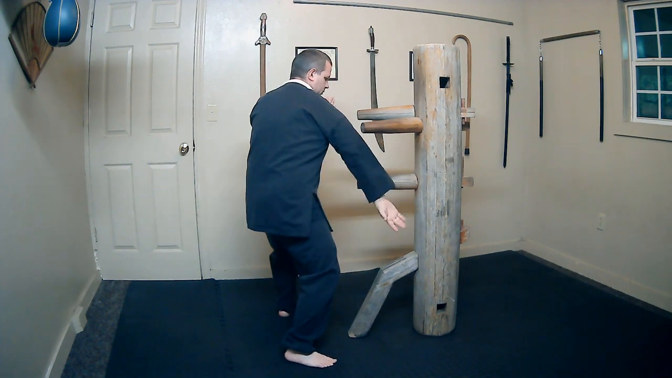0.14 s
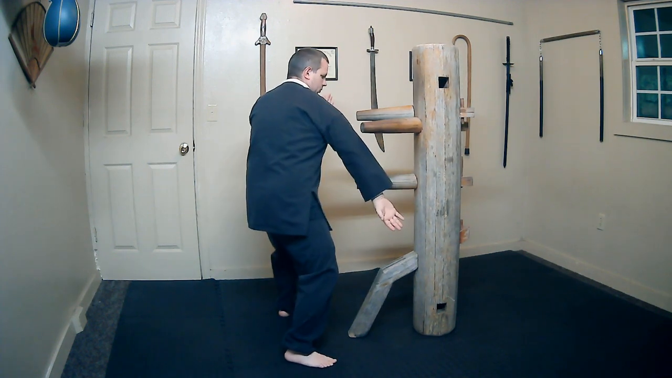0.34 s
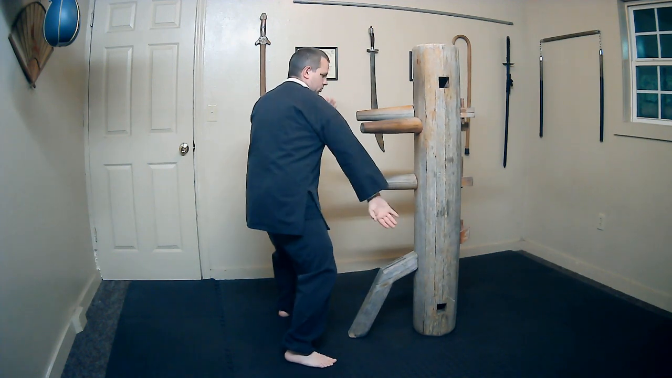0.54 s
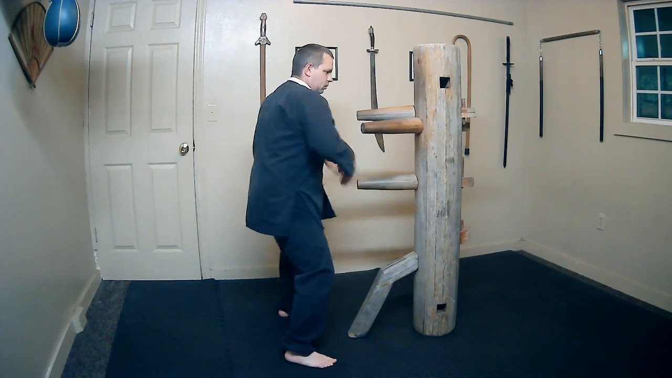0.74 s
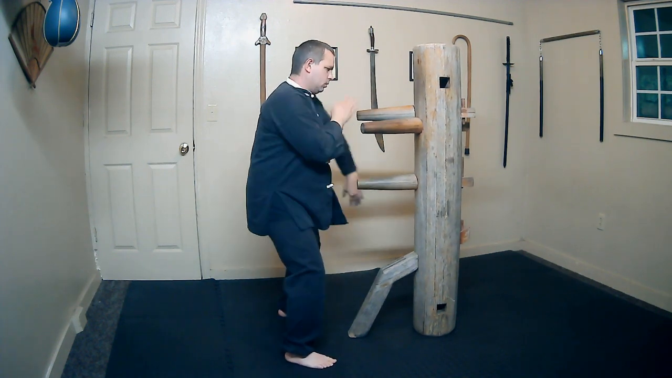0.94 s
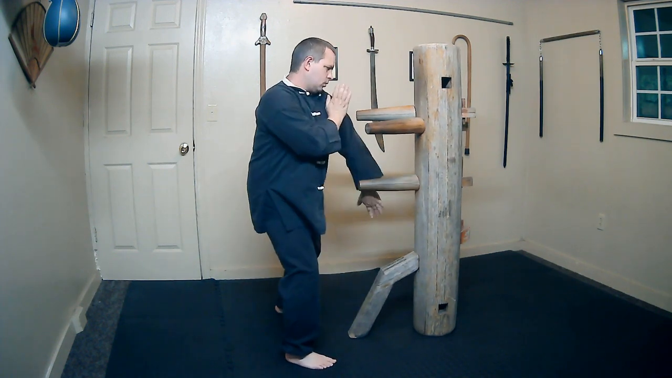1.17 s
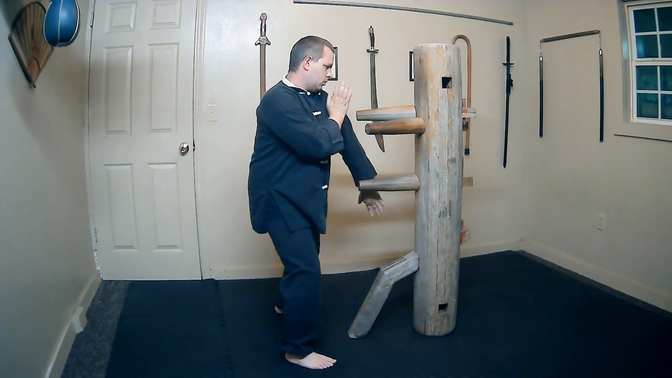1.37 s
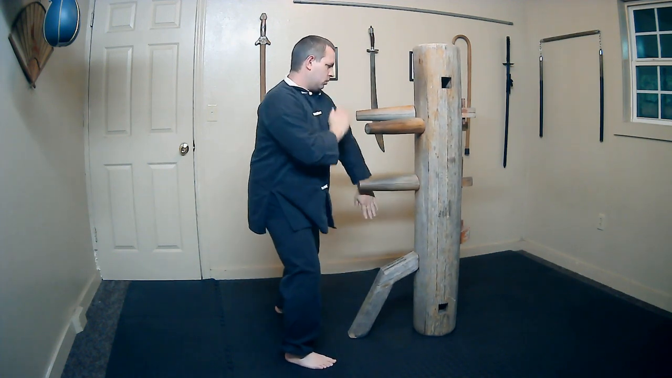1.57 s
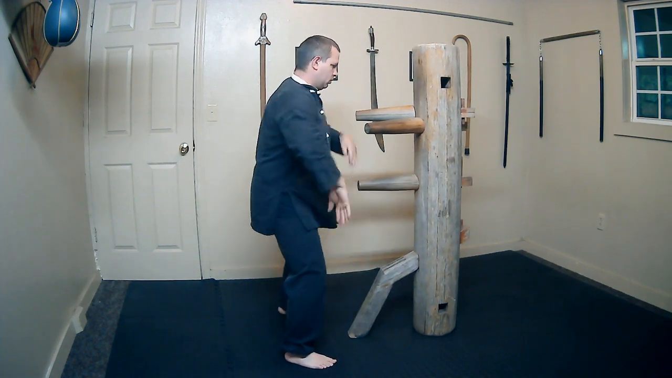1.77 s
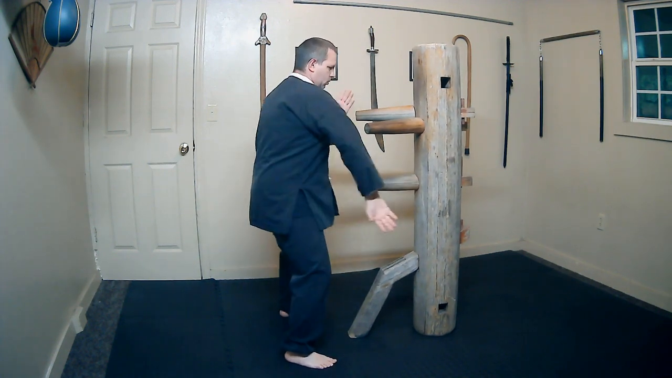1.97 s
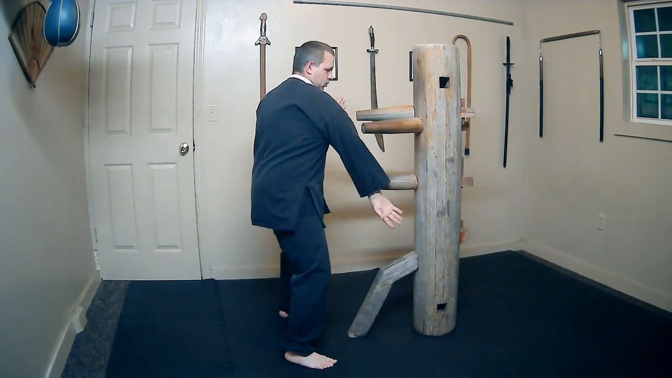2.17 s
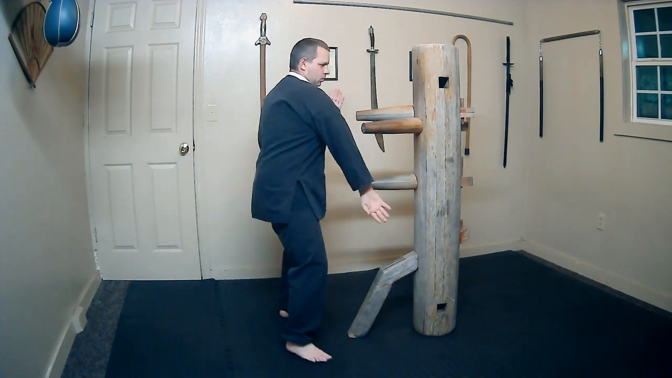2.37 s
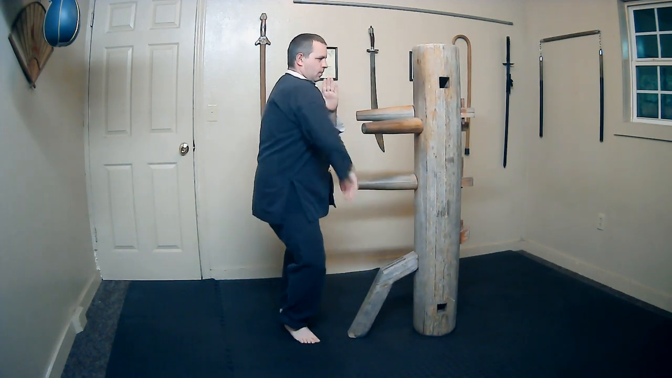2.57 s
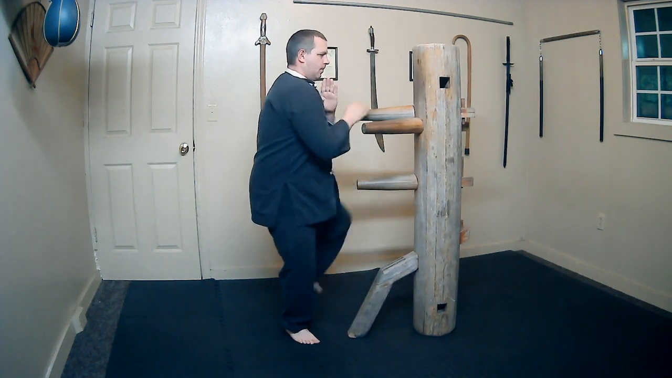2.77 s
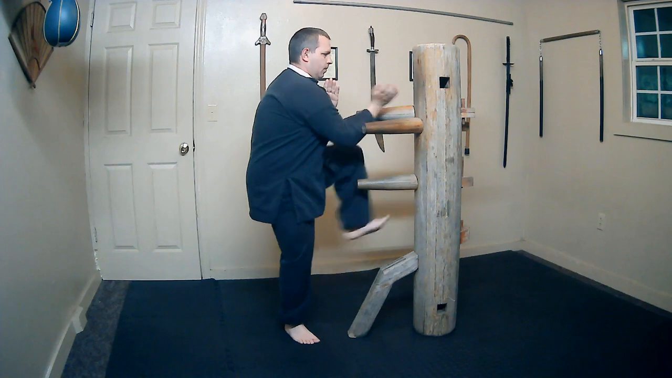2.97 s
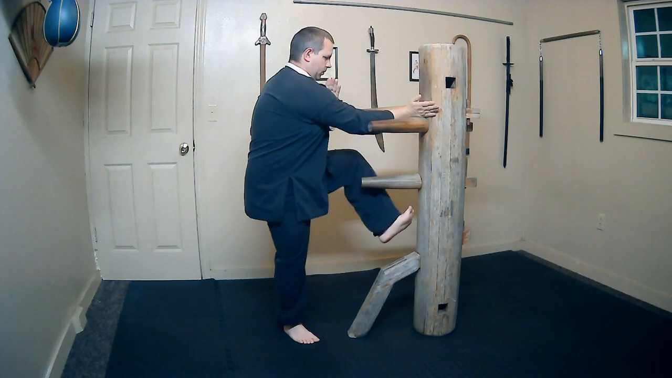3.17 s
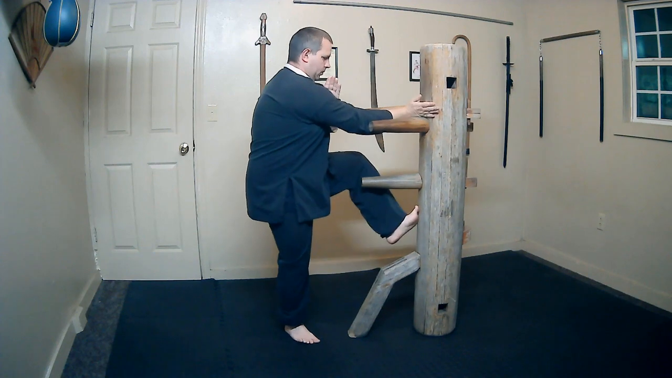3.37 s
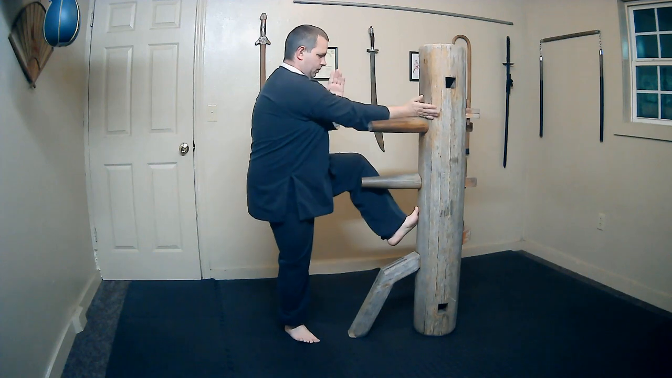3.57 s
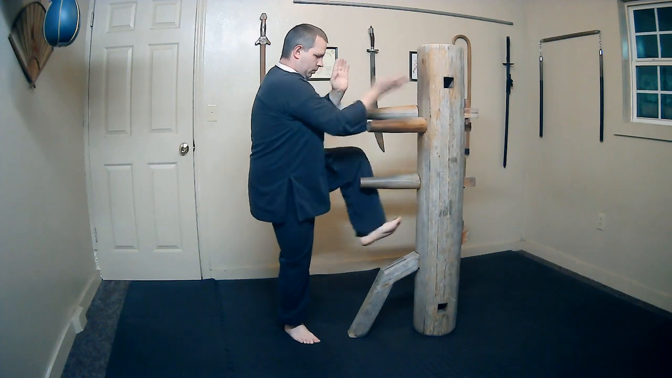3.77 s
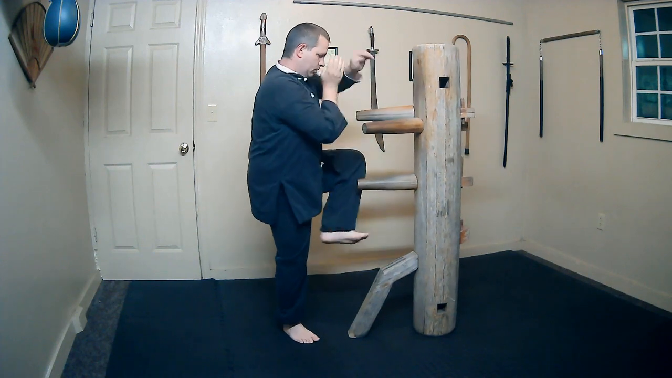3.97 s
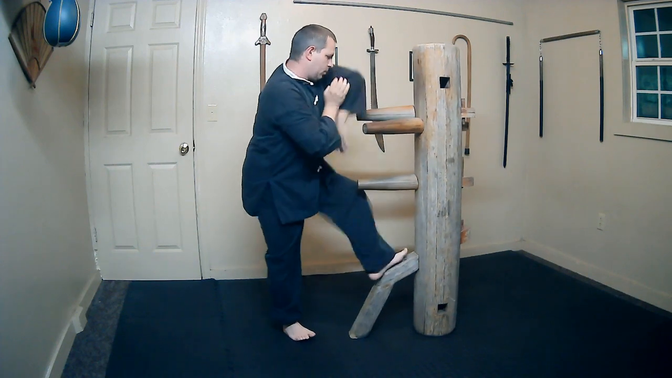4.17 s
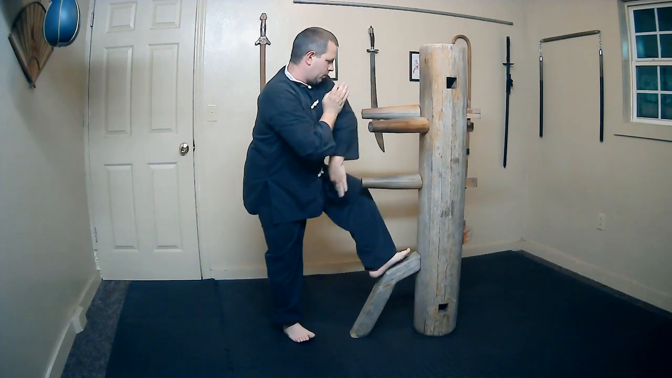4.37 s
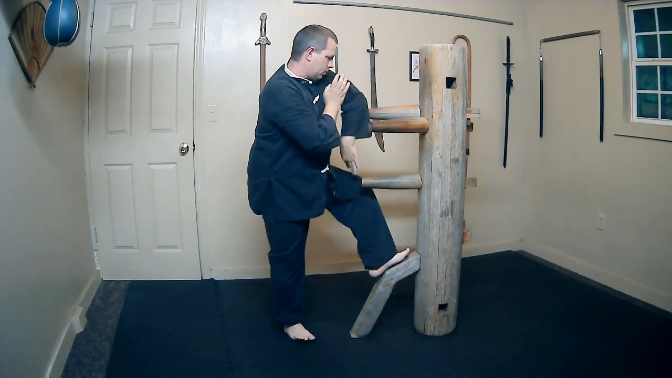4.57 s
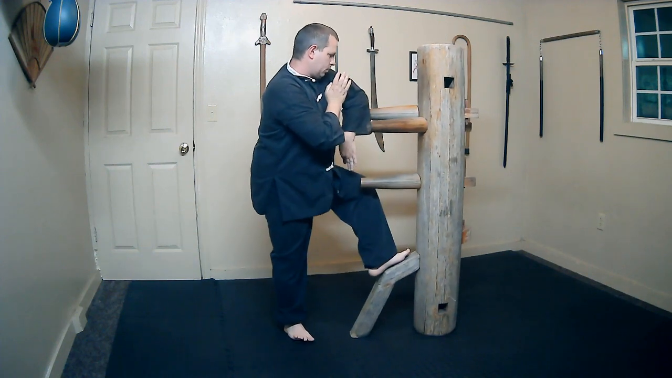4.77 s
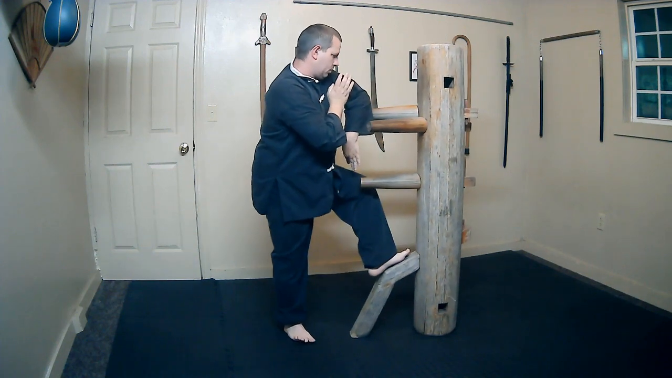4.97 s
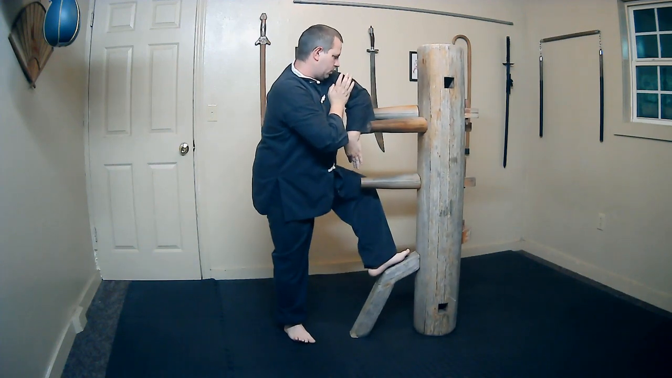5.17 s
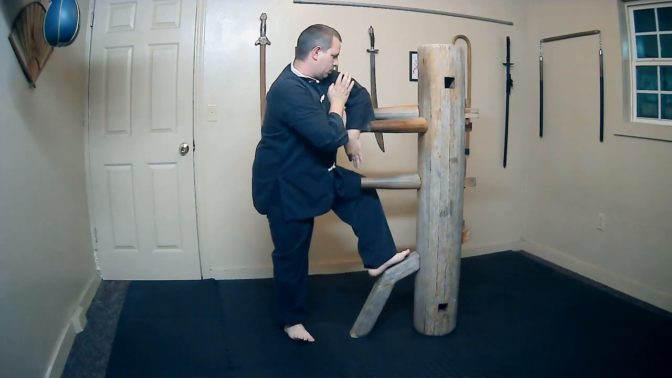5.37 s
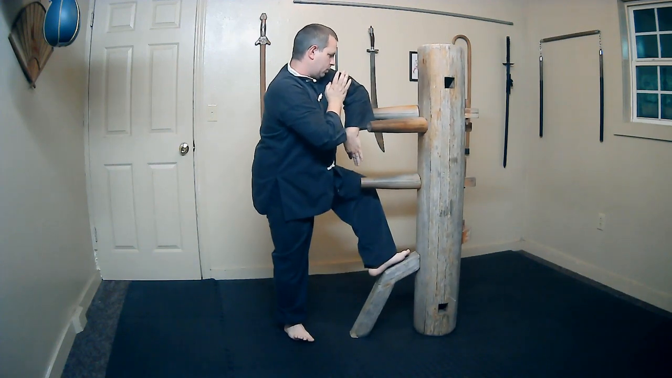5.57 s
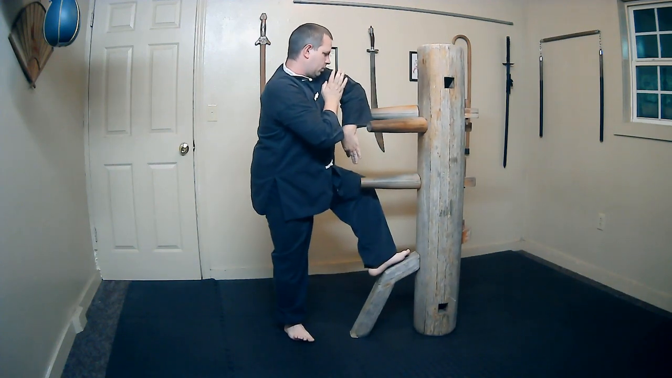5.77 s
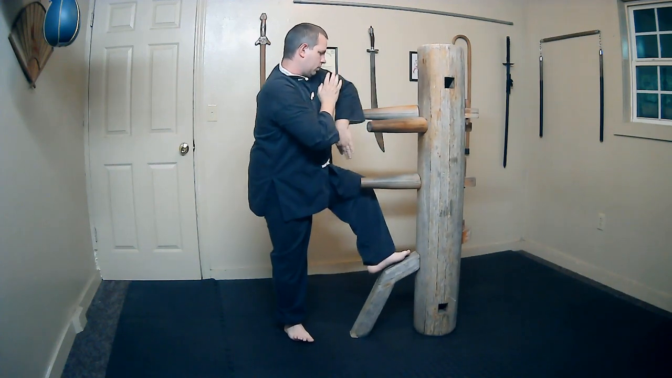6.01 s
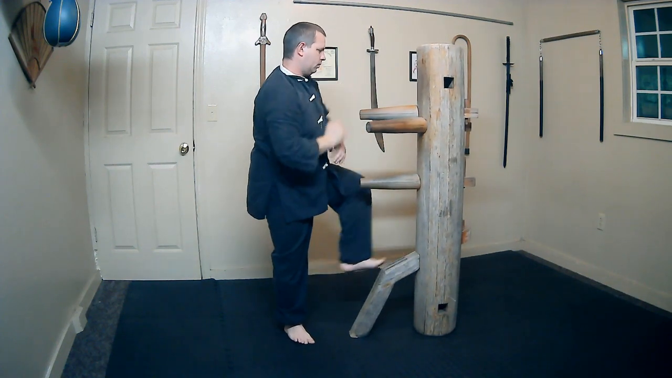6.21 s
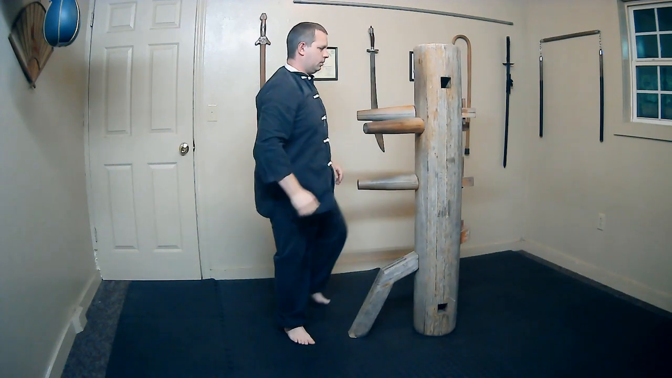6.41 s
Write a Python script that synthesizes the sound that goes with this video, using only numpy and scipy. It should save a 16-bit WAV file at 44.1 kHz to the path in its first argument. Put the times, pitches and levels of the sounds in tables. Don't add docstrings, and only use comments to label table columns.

```python
import sys
import numpy as np
from scipy import signal
from scipy.fft import rfft, irfft
from scipy.io import wavfile
from scipy.ndimage import uniform_filter1d

SR = 44100
rng = np.random.default_rng(int(sys.argv[2]) if len(sys.argv) > 2 else 0)


def int16_out(signal):
    q = np.round(np.clip(np.atleast_2d(signal).T, -1, 1) * 32767)
    wavfile.write(sys.argv[1], SR, q.astype(np.int16))


def ratio_of_db(decibels):
    return 10 ** (np.asarray(decibels, float) / 20)


N = 284180

# start in seconds, strength in dB, post share in dB, hard edge share in dB.
CONTACTS = [(0.135, -19.5, -13, -7.5), (0.141, -23.5, 2, 1), (0.149, -44, 11, -13), (0.175, -29, 2.5, -18),
            (0.211, -39, 1.5, 1), (0.263, -30, -6, -23), (0.734, -30, -7.5, 3), (0.741, -28.5, -0.5, -11),
            (0.754, -35.5, 4.5, -0.5), (0.791, -29, -9, -10.5), (1.131, -10.5, -14, 3.5),
            (1.139, -14, -4, 1), (1.15, -18.5, -4, -5), (2.161, -18.5, 3, 4), (2.168, -11, -17, -0.5),
            (2.174, -18, -10.5, -3.5), (2.193, -15, 0.5, -28), (2.216, -33, -10, -10),
            (2.233, -39, -13.5, -17.5), (2.576, -51, 16.5, -12), (2.608, -41, 6.5, -22),
            (2.932, -67.5, 17, -26.5)]
# start in seconds, strength in dB, post share in dB, hard edge share in dB.
KICKS = [(1.745, -28, -28, -4), (1.7595, -30.5, -18, -13), (1.777, -35, -16, -18), (2.779, -44.5, -1, -9.5),
         (3.096, -32.5, -0.5, -30), (3.108, -26.5, -10, -24), (3.117, -26, -8.5, -17),
         (3.132, -37.5, 10, -24), (3.164, -51, -19, -30), (3.193, -44, -16, -30), (4.019, -57.5, 2, 11),
         (4.2255, -33, -8.5, -6), (4.244, -28, -5, 1.5), (4.234, -34, -10, -27), (4.253, -30, -10, -14),
         (4.261, -23, -16, -14.5), (4.2682, -24, -20, -20), (4.282, -34, -16, -25), (4.313, -47, 11, -30),
         (4.642, -60.5, 1.5, -27)]
# start in seconds, strength in dB.
PUSHES = [
    (0.1281, -34),
    (0.73, -30.5),
    (1.1289, -23),
    (2.1571, -25.5),
    (2.1587, -11.5),
]
PUSH_POST_DB = -13
# start of the blow in seconds, lower knock share in dB,
# upper knock share in dB, clack ring in dB, higher hard rings in dB.
BLOWS = [(0, -3, 0.5, -5, -8.5), (.6, -10, -4, -7, -5.5), (1.0, -1.5, 4.5, -3.5, -10.5),
         (1.6, -36, -13.5, -15, -14.5), (2.0, -22, -1.5, -7, -5), (2.5, -9, -3, -28, -24),
         (2.7, 2.5, 12.5, -25, -25), (3.0, -11, 0.5, -39, -40), (4.0, 1, 0, -37.5, -40),
         (4.2, -3, 9.5, -42, -40), (4.235, 12, 3, -40, -38.5), (4.258, 4, 9.5, -40, -40)]
# upper clack in dB, crack in dB, upper crack in dB, air in dB.
EDGE_COLOURS = [(2.5, -13.5, -14.5, -22.5), (-7, -20.5, -22.5, -30), (-1, -5, -0.5, -25),
                (-10.5, -22.5, -22, -35.5), (-5.5, -9, -9.5, -26.5), (0, 0, 0, -10), (0, 16.5, 2, -12),
                (10, 3.5, 0, -13), (0.5, 0, -1, -14), (7.5, 13.5, 3.5, -5), (-4, -15, -9, -16),
                (0, -9, -3, -8)]

# frequency in Hz, level in dB, T60 in seconds.
KNOCK_MODES = [(608.7, -0.24, 0.062), (688.3, -0.53, 0.056), (761, -2.3, 0.033)]
# frequency in Hz, level in dB, T60 in seconds.
POST_MODES = [(140.1, -16.5, 0.027), (204, -9, 0.034), (275, -3.5, 0.079), (301.6, -1, .1), (338, -3, 0.13),
              (368, 1.5, 0.054), (452, -1.5, 0.027)]
# frequency in Hz, level in dB, T60 in seconds.
LOWER_MODES = [(499, -1, .025), (510, -4.5, 0.13), (595, 1, 0.042)]
# frequency in Hz, level in dB, T60 in seconds.
UPPER_MODES = [(810, 0.5, 0.02), (917, 8.7, 0.011), (1055, 5.5, 0.026), (1276, 5, 0.0075)]
# frequency in Hz, level in dB, T60 in seconds.
LEG_FAMILIES = [
    [(644, 0.58, 0.0088)],
    [(179.3, -4.5, 0.054), (265, 6.5, 0.021), (307.6, 9.5, 0.049), (371, -2, 0.041)],
    [(543, 0.0074, 0.028)],
    [(838, 4, 0.0043), (944, 3.5, 0.013), (1133, -3, 0.0064)],
]
# (Hz, level in dB, T60 in seconds).
SNAP_PARTS = [
    (1060, 2150, [(1643.5, -7, 0.041), (1722, -5, .025)]),
    (2150, 3200, [(2606, 0.5, 0.023), (2720, -3.5, 0.013)]),
    (3098, 5300, [(3600, -9, .008), (4140, 0.5, .012)]),
    (5160, 7830, [(5640, -3.5, 0.014), (6560, 0, 0.008)]),
    (8437, 9800, []),
]
# start in seconds, level in dB,
# frequency in Hz, T60 in seconds.
SPOT_RINGS = [
    (1.7475, -40, 699, .06),
    (1.7606, -32.5, 691, .07),
    (2.168, -26, 1690, 0.054),
    (2.170, -30, 2680, 0.036),
    (2.7806, -43, 950, .02),
    (3.11, -42, 898, .03),
    (4.247, -28, 1000, 0.029),
    (4.2624, -19, 1040, 0.032),
    (4.2695, -20, 896, .035),
    (4.2694, -22.5, 563, 0.034),
]

# peak in seconds,
# free swing in seconds, board level in dB, joist level in dB, rise in dB per second.
FLOOR_SWINGS = [(0.0, 0.092, -62.5, -66, 500), (0.16, .38, -51, -52, 600), (0.8, 0.12, -55, -52, 200),
                (1.19, 0.13, -51, -65.5, 347.5), (1.82, .03, -62, -56.5, 400), (2.22, .33, -43.5, -52, 293),
                (2.606, .22, -54.5, -50, 797), (2.9, .03, -61.5, -72, 300), (3.141, 0.026, -42, -42, 600),
                (3.3, 0.17, -61.5, -55.5, 200), (4.062, 0.053, -62.5, -65.5, 498),
                (4.249, .21, -31, -32.5, 1300), (4.64, 0.039, -59.5, -57.5, 197)]
# start in seconds, level in dB.
LURCHES = [
    (1.139, -73),
    (2.169, -63),
    (2.779, -63),
    (3.129, -30.5),
    (4.239, -50),
]
BOARD_HZ, JOIST_HZ, LURCH_HZ = 83.6, 51, 28
DAMPED_DB_PER_S, BOARD_SAG_DB_PER_S, JOIST_SAG_DB_PER_S = 352, 43, 120

# start in seconds, hold in seconds, level in dB,
# low share in dB, top share in dB.
SLIDES = [(0.0, 0.01, -53.5, -5.5, -16), (0.139, .01, -57, 7.5, -15), (1.051, 0.016, -62.5, 3, -18),
          (1.125, .012, -55, -3, -13), (1.81, 0.08, -58.5, 0, -10.5), (2.376, 0.0093, -50.5, -14, -14),
          (2.427, .19, -49, -1, -9), (2.755, .01, -59.5, -2, -4), (2.779, 0.017, -50.5, -1.5, -19),
          (2.966, 0.14, -69, 2, -8), (3.124, 0.008, -55, 0, -7), (3.252, 0.059, -70, -6, -12),
          (3.399, 0.093, -73, 0, -10), (4.004, 0.0086, -62, -4, -26), (4.064, 0.093, -68, -2.5, -9),
          (4.644, 0.012, -61, -15, -20.5), (5.947, .004, -76, 2, -15), (6.174, 0.0062, -69, 3.5, -29.5),
          (6.225, 0.21, -76.5, 3, -8.5)]
# frequency in Hz, density in dB per Hz.
SLIDE_COLOUR = [(300, -19.5), (600, -5.5), (1200, -8), (2200, -5), (3200, -6.5), (6700, -8), (8500, -10),
                (12000, -13), (15700, -18.5)]
SLIDE_RISE_DB_PER_S, SLIDE_FALL_DB_PER_S = 600.5, 260
# start in seconds, level
# in dB, centre frequency in Hz.
TICKS = [(1.059, -36, 7200), (1.8223, -32.5, 5800), (2.375, -27, 5100), (2.4109, -28.5, 6070),
         (2.7906, -28, 6530), (3.4042, -42, 4130), (3.4231, -46.5, 3520), (3.4765, -48.5, 3880),
         (3.7399, -39.5, 8470), (3.9968, -47, 4350), (4.0218, -44, 2150), (4.0614, -45, 4300),
         (4.0991, -39.5, 3400), (4.228, -19, 3600), (4.2283, -24.5, 4870), (4.6428, -44, 4360),
         (6.1779, -40, 3650), (3.731, -44, 10280), (3.744, -35.5, 7510), (3.746, -37, 9890)]

# frequency in Hz, T60 in seconds.
ROOM_T60 = [(100, 0.46), (250, .45), (500, 0.34), (1500, 0.42), (4000, 0.38), (8000, 0.34), (14000, 0.25)]
# frequency in Hz, density in dB per Hz.
HISS_COLOUR = [(12, -48), (20, 1), (30, -0.5), (45, -7.5), (75, -8.5), (100, -15.5), (121, -5.5),
               (146, -16.5), (198, -12), (250, -17), (600, -22.5), (2750, -29.5), (13500, -35),
               (16000, -37)]
HISS_DB = -61.5
HUM_HZ, HUM_DB = 115.9, -82.5
CUTOFF_HZ = 15830


def wood(s, db, post_db, families, push_samples):
    lower_db, upper_db = shares(BLOWS, s)[1:3]
    family_shares_db = (0, post_db, lower_db, upper_db)
    body = sum(struck(modes, s + 0.0012, db + share_db - 6.0, spread_db=3.5)
               for modes, share_db in zip(families, family_shares_db))
    push = np.hanning(push_samples)
    return np.convolve(body, push / push.sum())[:N]


def struck(modes, times, db, spread_db):
    luck = rng.standard_normal((len(times), len(modes)))
    out = 0
    for k, (hz, mode_db, t60) in enumerate(modes):
        force = clicks(times, db + mode_db + spread_db * luck[:, k])
        out = out + ring(force, hz, t60) * (-1) ** k
    return out


def ring(force, hz, t60):
    radius = ratio_of_db(-60 / (t60 * SR))
    w = 2 * np.pi * hz / SR
    return signal.lfilter([0, np.sin(w)], [1, -2 * radius * np.cos(w), radius * radius], force)


def clicks(times, db):
    out = np.full(N, 1e-18)
    np.add.at(out, (np.asarray(times) * SR).astype(int), ratio_of_db(db))
    return out


def shares(table, s):
    blow = np.searchsorted(np.array(BLOWS)[:, 0], s) - 1
    return np.array(table)[blow].T


def snaps():
    s, db, _, edge_db = np.transpose(CONTACTS + KICKS)
    parts_db = db + edge_db + [0 * s, *shares(EDGE_COLOURS, s)]
    rings_db = shares(BLOWS, s)[[3, 4, 4, 4, 4]]
    s = s + 0.0024
    out = 0
    for (low, high, modes), part_db, ring_db in zip(SNAP_PARTS, parts_db, rings_db):
        impact = clicks(s, part_db + 0.5) + burst(s, part_db - 0.5, 0.0059)
        out = out + band(impact, low, high, order=3) + struck(modes, s, part_db + ring_db, spread_db=6.5)
    return out


def burst(times, db, length_s):
    envelope = signal.lfilter([1], [1, -np.exp(-1 / (length_s * SR))], clicks(times, db))
    return envelope * rng.standard_normal(N)


def band(x, low_hz, high_hz, order):
    return signal.sosfilt(signal.butter(order, [low_hz, high_hz], "band", fs=SR, output="sos"), x)


def spot_rings():
    return sum(ring(clicks([s], db), hz, t60) for s, db, hz, t60 in SPOT_RINGS)


def boards():
    s, free_s, board_db, joist_db, rise = np.transpose(FLOOR_SWINGS)
    board = strokes(s, free_s, board_db, rise, BOARD_SAG_DB_PER_S, DAMPED_DB_PER_S)
    joist = strokes(s, free_s, joist_db, rise, JOIST_SAG_DB_PER_S, DAMPED_DB_PER_S)
    waver = 1 + 0.022 * rms_one(uniform_filter1d(rng.standard_normal((2, N)), size=4000))
    phase = 2 * np.pi * np.cumsum(waver * [[BOARD_HZ], [JOIST_HZ]], axis=1) / SR
    swing = np.sqrt(2) * np.sin(phase)
    s, db = np.transpose(LURCHES)
    lurch = ring(clicks(s, db - 2.5), LURCH_HZ, 0.14)
    lurch = signal.sosfilt(signal.butter(2, 120, fs=SR, output="sos"), lurch)
    return board * swing[0] + joist * swing[1] + lurch


def strokes(start_s, hold_s, db, rise, sag, fall):
    step = 32
    t = np.arange(0, N + step, step)[:, None] / SR - start_s
    decay_db = -sag * t - fall * np.maximum(t - hold_s, 0)
    shape_db = db + np.minimum(rise * t, decay_db)
    return np.interp(np.arange(N) / step, np.arange(len(t)), ratio_of_db(shape_db).sum(axis=1))


def slides():
    s, hold_s, db, low_db, top_db = np.transpose(SLIDES)
    gains = np.array([strokes(s, hold_s, db + share_db, SLIDE_RISE_DB_PER_S, 0, SLIDE_FALL_DB_PER_S)
                      for share_db in (low_db, 0, top_db)])
    grain = ratio_of_db(2.0 * rms_one(uniform_filter1d(rng.standard_normal(N), size=60)))
    edges_hz = [(450, 2700), (2700, 8600), (8600, 15700)]
    parts = [rms_one(band(coloured(SLIDE_COLOUR, N) * grain, low, high, order=2)) for low, high in edges_hz]
    return ratio_of_db(-3.0) * np.sum(gains * parts, axis=0)


def ticks():
    out = np.zeros(N)
    for s, db, hz in TICKS:
        at = round(s * SR)
        t = np.arange(round(5 * SR / hz)) / SR
        out[at:at + len(t)] += ratio_of_db(db - 6.0) * np.sin(2 * np.pi * hz * t) * np.hanning(len(t))
    return out


def room(x, wet_db):
    t = np.arange(round(0.8 * SR)) / SR
    edges = 60 * 2 ** np.arange(0, 8.3, 1 / 3)
    white = rng.standard_normal((3, len(t))) * ratio_of_db(3.5 * rng.standard_normal(len(t)))
    tail = np.zeros(len(t))
    for k, (low, high) in enumerate(zip(edges, edges[1:])):
        decay = ratio_of_db(-60 * t / at_hz(ROOM_T60, np.sqrt(low * high)))
        tail += band(white[k % 3], low, high, order=2) * decay
    tail = tail * np.clip((t - 0.003) / 0.007, 0, 1)
    tail = tail / np.sqrt(np.sum(tail ** 2))
    return x + ratio_of_db(wet_db) * signal.fftconvolve(x, tail)[:N]


def background():
    hum = rms_one(ring(ring(rng.standard_normal(N), HUM_HZ, 0.5), HUM_HZ, 0.5))
    return ratio_of_db(HISS_DB) * coloured(HISS_COLOUR, N) + ratio_of_db(HUM_DB) * hum


def coloured(spectrum, size):
    hz = np.maximum(np.fft.rfftfreq(size, 1 / SR), 1)
    white = rfft(rng.standard_normal(size))
    return rms_one(irfft(white * ratio_of_db(at_hz(spectrum, hz)), size))


def at_hz(points, hz):
    points = np.array(points)
    return np.interp(np.log(hz), np.log(points[:, 0]), points[:, 1])


def rms_one(x):
    return x / np.sqrt(np.mean(x ** 2) + 1e-20)


def scene():
    arm = [KNOCK_MODES, POST_MODES, LOWER_MODES, UPPER_MODES]
    push_s, push_db = np.transpose(PUSHES)
    pushes = wood(push_s - 0.00097, push_db, PUSH_POST_DB, arm, push_samples=35)
    blows = wood(*np.transpose(CONTACTS)[:3], arm, push_samples=25)
    kicks = wood(*np.transpose(KICKS)[:3], LEG_FAMILIES, push_samples=25)
    bass_cut = signal.butter(2, 130, "high", fs=SR, output="sos")
    dummy = signal.sosfilt(bass_cut, pushes + blows + kicks)
    near = room(dummy + spot_rings() + snaps() + ticks() + slides(), wet_db=-1.0)
    return (near + boards() + background())[None]


def top_cut(x):
    return signal.sosfilt(signal.butter(12, 16480, fs=SR, output="sos"), x)


def record(dry):
    low_pass = signal.ellip(12, 0.3, 60, CUTOFF_HZ, fs=SR, output="sos")
    mix = signal.sosfilt(low_pass, dry)
    return top_cut(mix)


dry = scene()
out = record(dry)
int16_out(out)
```